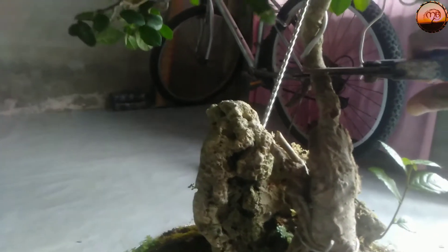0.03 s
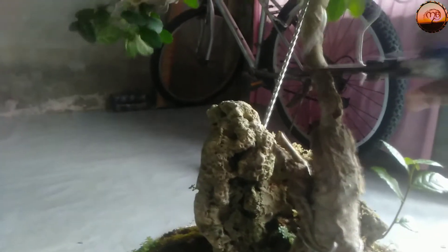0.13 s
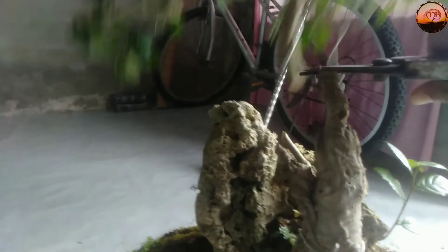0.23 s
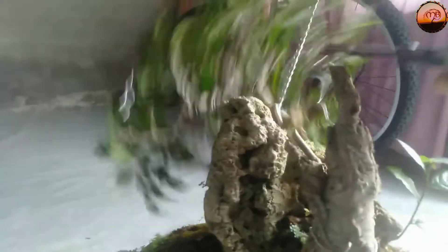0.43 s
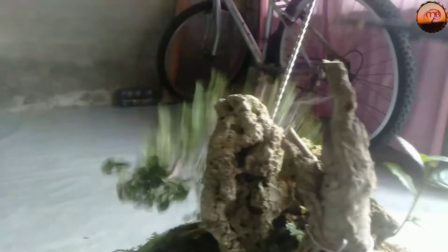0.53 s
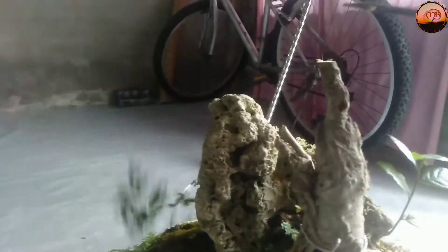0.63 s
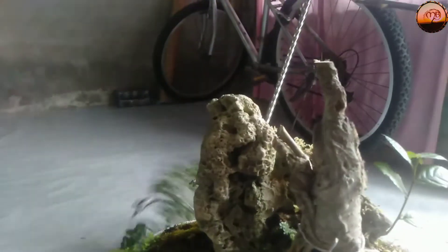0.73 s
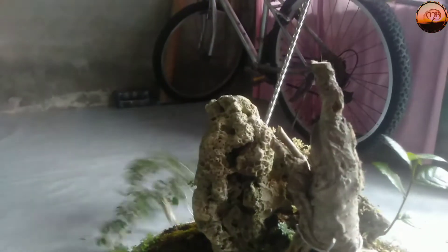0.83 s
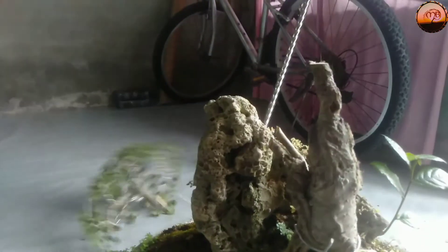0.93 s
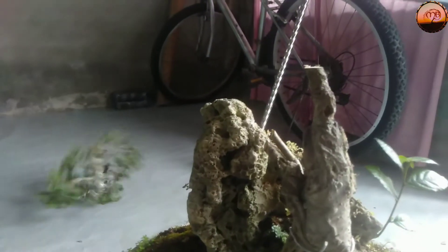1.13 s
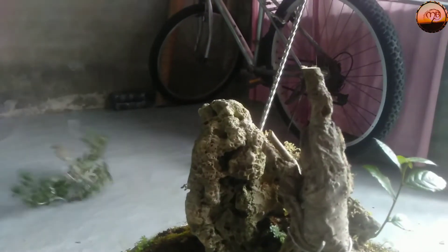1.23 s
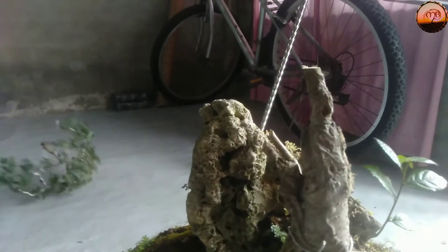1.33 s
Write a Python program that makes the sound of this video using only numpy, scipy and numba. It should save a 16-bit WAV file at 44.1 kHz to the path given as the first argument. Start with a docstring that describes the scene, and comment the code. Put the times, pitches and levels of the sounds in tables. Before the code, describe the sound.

Sharp crack of a thin trunk being cut, its leafy top knocking onto the floor.

```python
"""A small trunk creaks between cutter blades, then its fibres snap, close by in a bare, hard room.
The leafy top brushes past the stump, knocks on the floor, bounces and rolls with a rustle.
A soft hiss and a low rumble lie underneath. The snap overloads the microphone,
and the gain control turns the sound down, then lets it come back."""
import sys
import numpy as np
from scipy import signal
from scipy.fft import rfft, irfft
from scipy.io import wavfile
from numba import njit

SR = 44100
rng = np.random.default_rng(int(sys.argv[2]) if len(sys.argv) > 2 else 0)


def unload_wav(signal):
    """Save mono or channel-first audio to the path in sys.argv[1] as 16-bit WAV at rate SR, clipped to [-1, 1]."""
    wavfile.write(
        sys.argv[1],
        SR,
        np.round(np.clip(np.atleast_2d(signal).T, -1, 1) * 32767).astype(np.int16),
    )


N = 61739

# bundles of fibres breaking (time [s], level [dB], fade [s])
FIBRE_BREAKS = [(.2192, -21, .002), (.2205, -18, .003), (.2245, -13, .004), (.2269, -5, .0025),
                (.2288, -5, .002), (.231, 3, .002), (.2355, -6, .002)]
# tone of the snap up close (frequency [Hz], level [dB])
SNAP_TONE = [(100, -1), (320, -18), (440, 17), (560, -9.5), (710, 10), (900, -3.5), (1600, 4.5), (2900, 2),
             (3500, -4.5), (4200, 5.5), (5000, -5.5), (6300, 4), (8500, -7.5), (12000, -5), (13500, -5.5),
             (14700, 1)]
# tone of the snap as it spreads into the room (frequency [Hz], level [dB])
SNAP_ECHO_TONE = [(170, -24), (400, -12.5), (700, -15), (1000, -16), (1300, -9), (1570, 1.5), (1790, 8),
                  (1970, 0.5), (2200, -8.5), (2700, -12), (3500, -14), (4200, -10.5), (5000, -14.5),
                  (6300, -6), (9000, -20.5), (13000, -19), (14800, -8)]
# ringing of the trunk as it parts (frequency [Hz], time to fade by 60 dB [s], level [dB])
TRUNK_NOTES = [(103, 0.059, -15.5), (182, 0.045, -15), (452, 0.046, -15.5), (718, 0.043, -14),
               (1024, 0.045, -17.5), (1259, 0.049, -14), (1548, 0.05, -6), (1743, 0.055, -8.5),
               (1930, 0.036, -16), (2550, 0.011, -19), (4340, 0.035, -22)]
# wood creaking under the blades (time [s], level [dB], fade [s])
WOOD_CREAKS = [(.0795, -45, 0.015), (.1168, -36.5, 0.0074), (.1425, -39.5, 0.011), (.158, -42, 0.0071),
               (.1735, -39.5, 0.005), (.177, -29.5, 0.0047), (.194, -34.5, 0.017), (.2025, -32, 0.017),
               (.212, -38, 0.0091)]
# tone of a creak (frequency [Hz], level [dB])
CREAK_TONE = [(500, -3), (2500, -17.5), (5000, -14.5), (6300, 0), (7800, -22.5), (11000, -24), (13500, -20),
              (15200, -8.5)]
# the cut top hitting the floor (time [s], level [dB], extra level of its tick [dB])
FLOOR_KNOCKS = [(0.7545, -19.5, 2), (0.756, -22, -4), (.7588, -22, -26), (.761, -8.5, 2),
                (0.7632, -18.5, -4), (0.7742, -26, -2), (0.778, -27, -11), (0.7836, -19.5, 7.5),
                (.7925, -21, -14), (.852, -42, 9), (0.9064, -23.5, 7.5), (.9086, -23, -5),
                (0.9204, -28, -3), (1.005, -37.5, 16), (1.077, -35, 0)]
# ringing of the cut top (frequency [Hz], time to fade by 60 dB [s], level [dB])
BRANCH_NOTES = [(903, .015, -19), (1415, 0.031, -18.5), (1607, 0.035, -16), (1743, 0.016, -11),
                (2008, 0.012, -2.5), (2420, 0.0099, -10.5), (2700, 0.013, -20)]
# leaves brushing and settling (peak time [s], level [dB], rise [s], fade [s])
LEAF_RUSTLES = [(0.589, -39.5, 0.0063, 0.014), (.655, -37.5, 0.032, 0.039), (.768, -32.5, 0.006, 0.042),
                (.86, -40.5, 0.021, 0.051), (0.919, -43, 0.022, 0.03), (1.066, -36, 0.018, 0.031),
                (1.315, -49.5, 0.0087, 0.042)]
# tone of the leaves (frequency [Hz], level [dB])
LEAF_TONE = [(150, -4), (400, -8), (900, -7), (1700, -2), (2600, 0), (3800, -5.5), (6500, 1.5), (9000, -10),
             (12000, -5), (15000, 4)]
# twigs scraping the floor as the top rolls (peak time [s], level [dB], rise [s], fade [s])
TWIG_SCRAPES = [(.925, -44.5, 0.028, 0.024), (1.075, -41, 0.035, 0.033), (1.238, -46.5, 0.007, 0.032),
                (1.315, -44, 0.012, .035), (1.39, -54, 0.016, .03)]
# tone of a scrape (frequency [Hz], level [dB])
SCRAPE_TONE = [(200, -24), (650, -17), (1000, -16.5), (1500, 4), (2300, -6), (3200, -11), (8000, -36)]
# length of the room's echo (frequency [Hz], time to fade by 60 dB [s])
ECHO_TIMES = [(400, 0.74), (1800, 0.46), (6000, 0.48), (15000, 0.4)]
# tone of the background noise (frequency [Hz], level [dB])
AIR_TONE = [(25, 0.5), (45, -3), (95, 0), (190, -4.5), (290, -16.5), (650, -15), (1000, -19.5), (1600, -18),
            (3500, -29), (9000, -32), (13000, -33.5), (15200, -21)]
# rise and fall of the background's bass (time [s], boost [dB])
RUMBLE_BOOST = [(0, 4), (.15, 2.5), (.45, -6.5), (.9, -4.5), (1.07, -0.5), (1.27, -2.5), (1.4, 1)]

SNAP_S = .2316  # the moment the trunk parts


def fibres(events):
    """Wood creaks or snaps: each break is a short shower of clicks from tearing fibres."""
    power = sum((undb(db) * burst(s, fade)) ** 2 for s, db, fade in events)
    return np.sqrt(power) * clicks(per_second=12000, scatter_db=0.5)


def landing():
    """Each hit on the floor rings the light branch and adds a gritty tick; the first also thuds."""
    tick_db, tick_fade_s = -24.5, 0.0055
    blows, ticks = np.zeros(N), 0
    for s, db, extra_db in FLOOR_KNOCKS:
        blows[int(s * SR)] += undb(db)
        ticks += undb(db + extra_db + tick_db) * burst(s, tick_fade_s)
    wood = signal.fftconvolve(blows, ring(BRANCH_NOTES, 0))[:N]
    grit = unit(bandpass(rng.standard_normal(N), 310, 6040))
    thud = ring([(447, 0.018, -31.5)], FLOOR_KNOCKS[0][0])
    return bandpass(wood, 980, 2900, order=4) + ticks * grit + thud


def rustle(events, tone):
    """Leaves or twigs make many tiny touches that swell and fade as they move."""
    t = since(0)
    motion = sum(undb(db) * np.exp(-np.maximum((s - t) / rise, (t - s) / fade))
                 for s, db, rise, fade in events)
    return colour(motion * clicks(per_second=5000, scatter_db=2.5), tone)


def room_echo(bands=12):
    """The hard walls answer a click with a wash of noise whose high notes die first."""
    gap_s, build_s = 0.0014, 0.0027
    noise, t = rfft(rng.standard_normal(N)), since(gap_s)
    centres = np.geomspace(100, 16000, bands)
    hz = np.arange(len(noise)) * SR / N
    tail = 0
    for centre, weights in zip(centres, np.eye(bands)):
        band = irfft(noise * lookup(list(zip(centres, weights)), hz), N)
        tail += band * np.exp(-np.log(1000) * t / lookup(ECHO_TIMES, centre))
    tail *= 1 - np.exp(-t / build_s)
    return tail / np.linalg.norm(tail)


def background():
    """A steady hiss lies over a low rumble that sinks and returns."""
    air = undb(-43.5) * colour(rng.standard_normal(N), AIR_TONE)
    boost_db = np.interp(since(0), *np.array(RUMBLE_BOOST).T)
    return air + lowpass(air, hz=280) * (undb(boost_db) - 1)


def clicks(per_second, scatter_db):
    """A dense stream of tiny clicks of uneven size."""
    size = undb(scatter_db * np.minimum(rng.exponential(size=N), 5))
    happens = rng.random(N) < per_second / SR
    return unit(happens * size * rng.choice([-1, 1], N))


def ring(notes, s):
    """Fading notes, all struck at time s."""
    t = since(s)
    return sum(undb(db) * np.sin(2 * np.pi * hz * t) * np.exp(-np.log(1000) * t / ring_s)
               for hz, ring_s, db in notes)


def burst(s, fade):
    """Start suddenly at time s, then die away."""
    return (since(s) > 0) * np.exp(-since(s) / fade)


def colour(x, tone, size=4096):
    """Give a sound the tone in a table; white noise keeps its overall level."""
    gains = undb(lookup(tone, np.arange(size // 2 + 1) * SR / size))
    cepstrum = irfft(np.log(gains))
    # fold the second half onto the first, so the filter never sounds early
    cepstrum[1:size // 2] *= 2
    cepstrum[size // 2 + 1:] = 0
    response = irfft(np.exp(rfft(cepstrum)))
    return signal.fftconvolve(x, response / np.linalg.norm(response))[:N]


def lowpass(x, hz):
    """Gently keep what lies below hz, without delay."""
    return signal.sosfiltfilt(signal.butter(2, hz, fs=SR, output="sos"), x)


def bandpass(x, low_hz, high_hz, order=2):
    """Keep what lies between two frequencies."""
    return signal.sosfilt(signal.butter(order, [low_hz, high_hz], "band", fs=SR, output="sos"), x)


def lookup(table, hz):
    """Read between a table's rows, giving each octave equal space."""
    frequencies, values = np.array(table).T
    return np.interp(np.log(np.maximum(hz, 1)), np.log(frequencies), values)


def since(s):
    """Seconds since a moment, zero before it."""
    return np.maximum(np.arange(N) / SR - s, 0)


def undb(db):
    """Turn decibels into a multiplier."""
    return 10 ** (np.asarray(db) / 20)


def unit(x):
    """Scale to an average power of 1."""
    return x / np.sqrt(np.mean(x ** 2))


def scene():
    """Creak, snap, fall and rustle sound in the room, over the background."""
    room, snap = room_echo(), fibres(FIBRE_BREAKS)
    # the other sources (sound, level sent to the echo [dB])
    sources = [(colour(fibres(WOOD_CREAKS), CREAK_TONE), -7),
               (undb(0.5) * ring(TRUNK_NOTES, SNAP_S), -12),
               (landing(), -3.5),
               (rustle(LEAF_RUSTLES, LEAF_TONE) + rustle(TWIG_SCRAPES, SCRAPE_TONE), -6)]
    direct = colour(snap, SNAP_TONE) + sum(x for x, db in sources)
    # the snap is so brief that it strikes the room as one blow
    blow = np.linalg.norm(snap) * (np.arange(N) == int(SNAP_S * SR))
    spread = colour(blow, SNAP_ECHO_TONE) + sum(x * undb(db) for x, db in sources)
    return (direct + signal.fftconvolve(spread, room)[:N] + background())[None]


@njit
def follow(x, rise_s, fall_s):
    """Track how loud a sound is, rising and falling at separate speeds."""
    levels, level = np.empty(len(x)), 0.
    for i in range(len(x)):
        level += (abs(x[i]) - level) / (SR * (rise_s if abs(x[i]) > level else fall_s))
        levels[i] = level
    return levels


def overload_swing():
    """The snap kicks the microphone off its rest level; it overshoots and creeps back."""
    rise_s, cross_s, fade_s = 0.0033, 0.045, 0.041
    t = since(SNAP_S)
    return 0.21 * (1 - np.exp(-t / rise_s)) * ((t / cross_s) ** 2 - 1) * np.exp(-t / fade_s)


def record(dry):
    """Loud parts are turned down and rounded off; the bass drops out briefly after the snap."""
    limit_db, top_hz = -17, 15500
    drop_s, hold_s, return_s = 0.0031, .15, 0.012
    level = follow(dry[0], rise_s=0.009, fall_s=0.052)
    x = np.tanh(dry[0] / np.maximum(1, level / undb(limit_db)))
    dropout = (1 - np.exp(-since(SNAP_S) / drop_s)) * np.exp(-since(SNAP_S + hold_s) / return_s)
    x -= 0.92 * dropout * lowpass(x, hz=700)
    treble_cut = signal.ellip(10, .2, 80, top_hz, fs=SR, output="sos")
    return signal.sosfilt(treble_cut, x + overload_swing())[None]


dry = scene()
out = record(dry)
unload_wav(out)
```